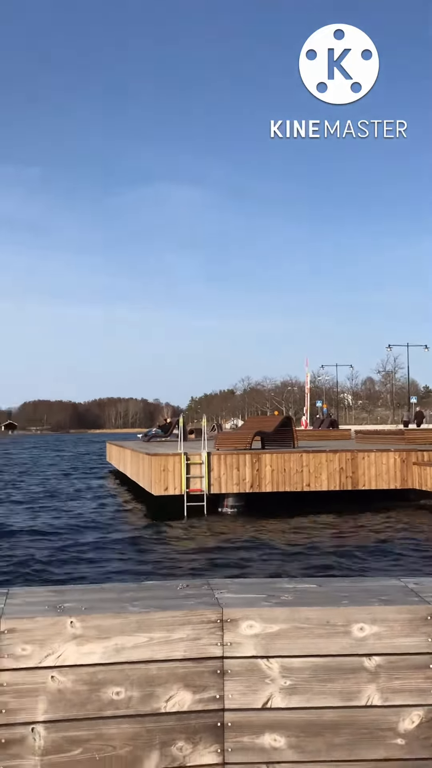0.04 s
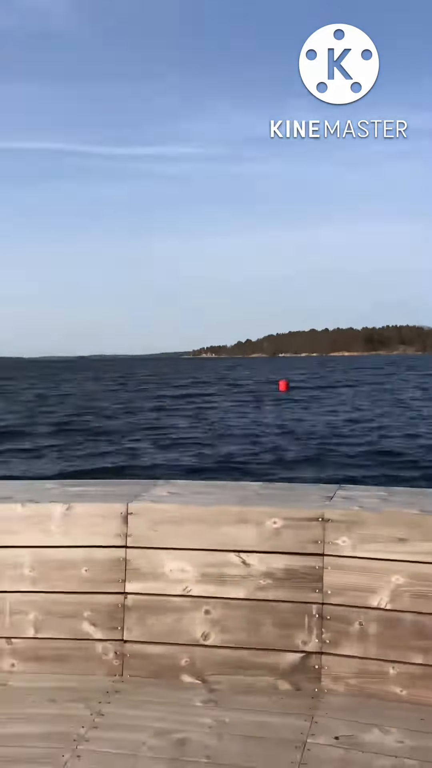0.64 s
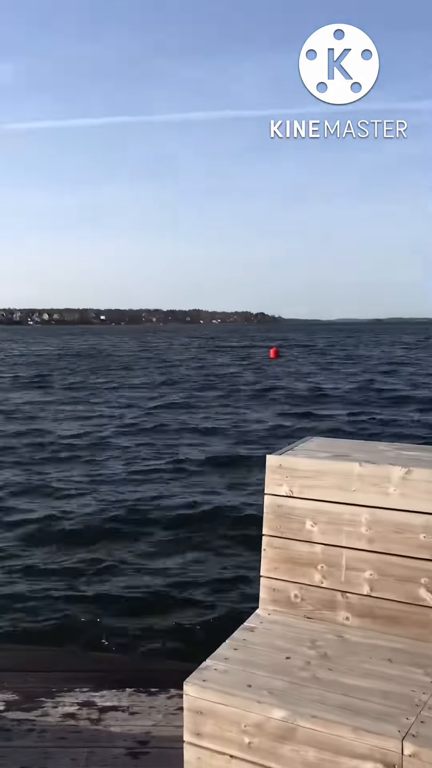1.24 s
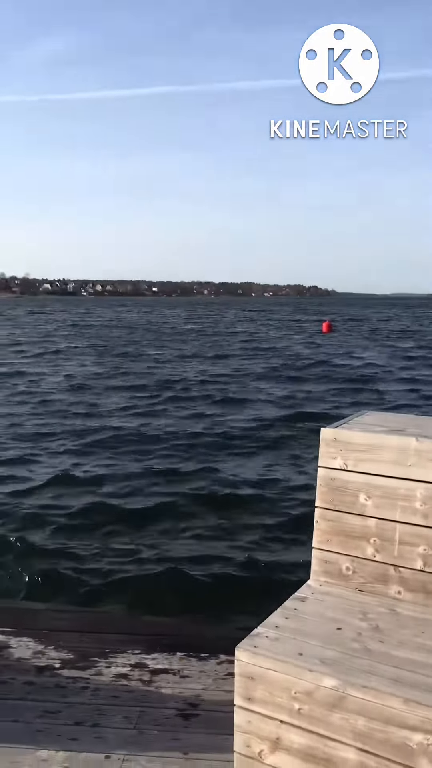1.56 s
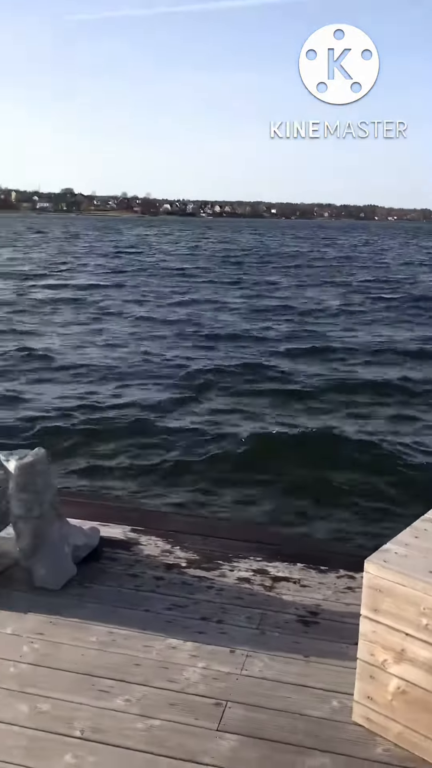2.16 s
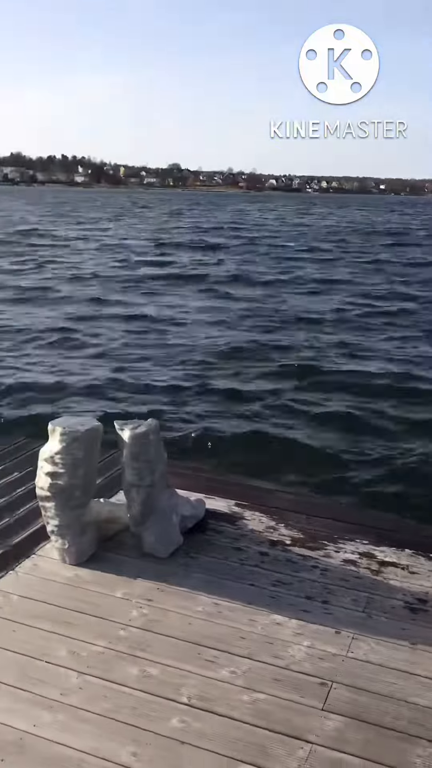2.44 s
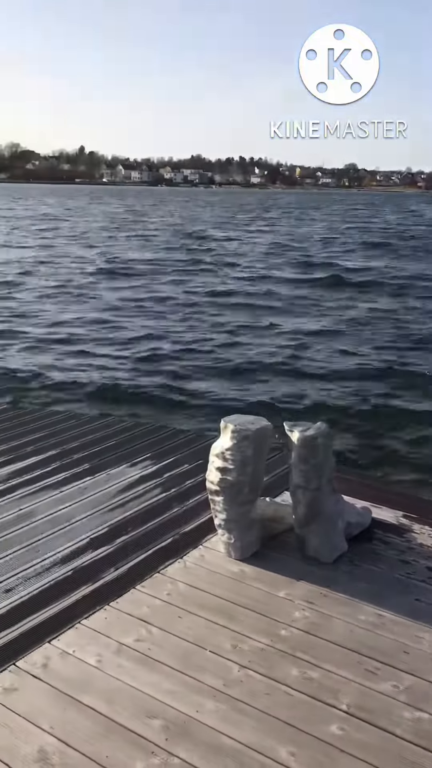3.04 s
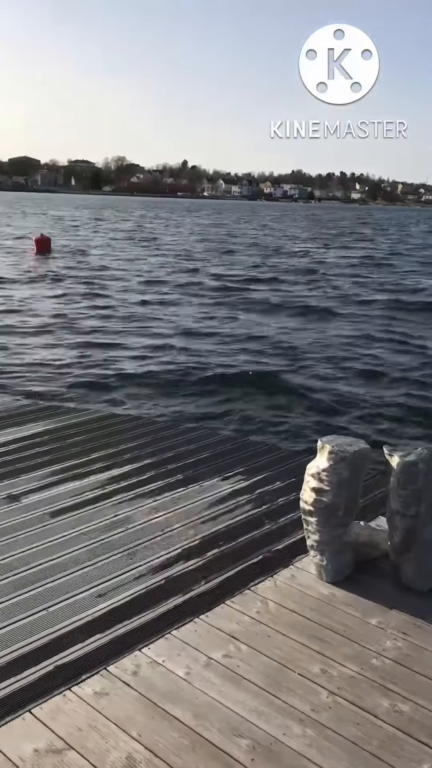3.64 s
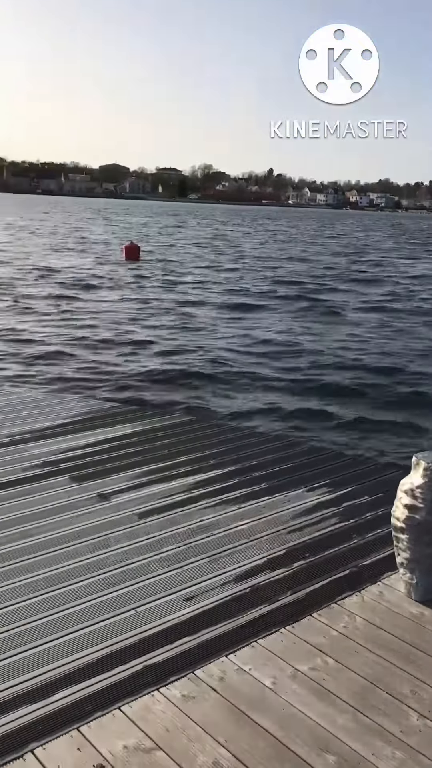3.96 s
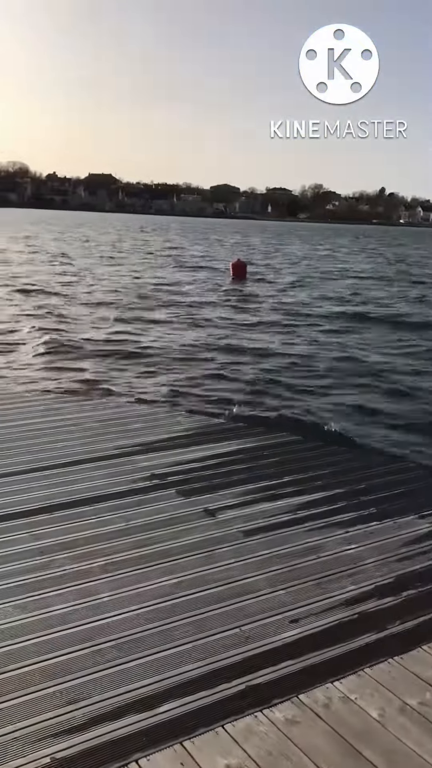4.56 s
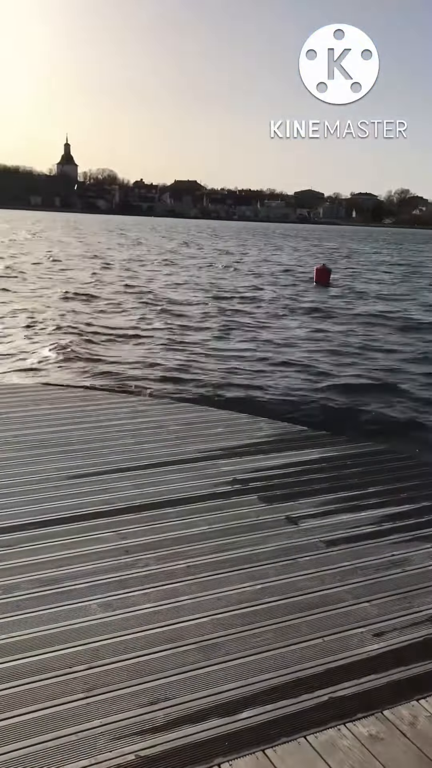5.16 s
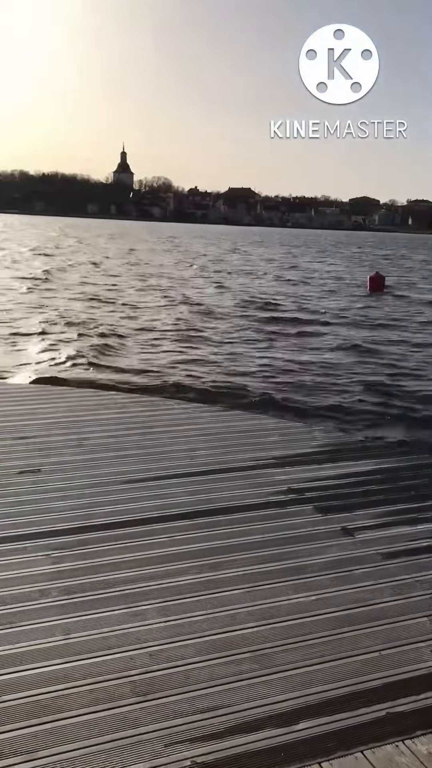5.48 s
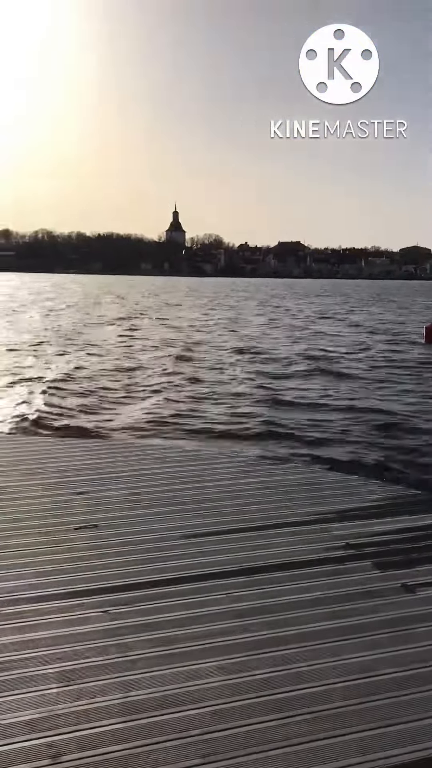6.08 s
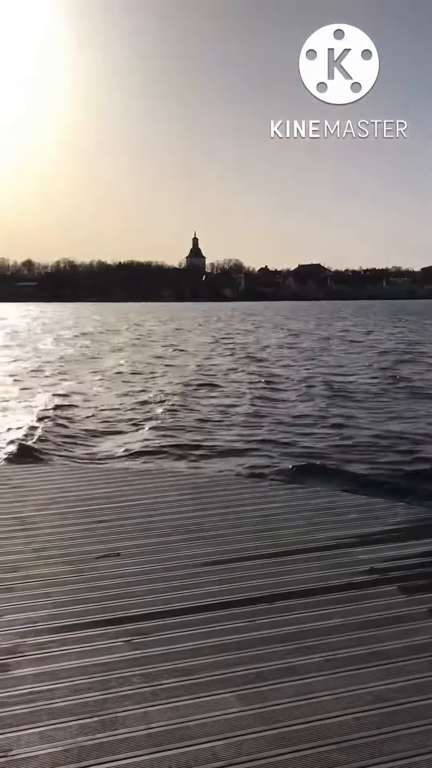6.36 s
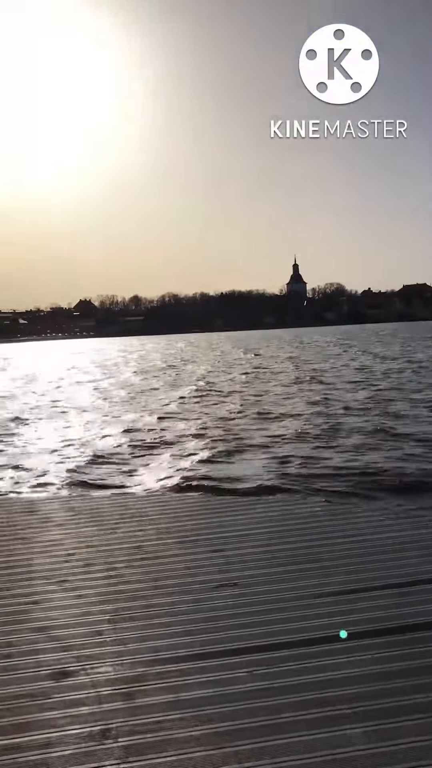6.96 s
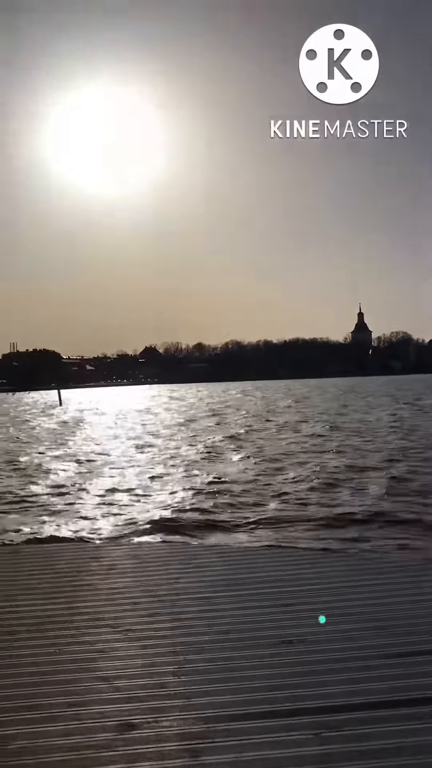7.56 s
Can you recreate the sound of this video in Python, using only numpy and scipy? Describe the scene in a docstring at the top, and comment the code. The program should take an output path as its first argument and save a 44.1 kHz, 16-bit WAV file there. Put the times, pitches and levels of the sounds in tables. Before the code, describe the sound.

Gusts of wind thump and rumble right on the microphone at the water's edge. When they drop, choppy water is heard sloshing and gurgling against wooden deck boards just in front, with small splashes, drips and hissing foam. Then a second, longer run of gusts batters the microphone, fluttering and briefly hooting, while the waves keep lapping more softly underneath.

```python
"""Choppy water at a windy deck

Small waves slop against a low wooden deck just in front of one microphone; each swells the wash
and throws fizzing spray, while drops land close by and trapped air glugs at the boards.
Wind rumbles right on the microphone throughout and buffets it in two long runs of gusts;
mostly in the second, the air sheds vortices at the microphone's edge and hoots unsteadily."""
import sys
import numpy as np
from scipy import signal
from scipy.fft import rfft, irfft, next_fast_len
from scipy.io import wavfile
from scipy.ndimage import uniform_filter1d, map_coordinates

SR = 44100
rng = np.random.default_rng(int(sys.argv[2]) if len(sys.argv) > 2 else 0)


def put_to_file(sound):
    """Save the sound as 16-bit audio at rate SR, in the file named by the first command-line argument."""
    columns = np.atleast_2d(sound).T  # one column per channel
    safe = np.clip(columns, -1, 1)
    whole_steps = np.round(safe * 32767)
    wavfile.write(sys.argv[1], SR, whole_steps.astype(np.int16))


N = 344862
TIME = np.arange(N) / SR

# air speed, as the rate at which small eddies pass the microphone: time_s, rate_hz
EDDY_RATE = [(0, 220.2), (.48, 680.5), (.56, 523.8), (.76, 518.8), (.88, 340.1), (1.1, 400.1),
             (1.35, 309.1), (1.65, 280.8), (2.1, 170.4), (4.8, 169.8), (5.0, 350.4), (5.7, 369.5),
             (6.85, 270), (7.1, 364.2), (7.33, 371.7), (7.43, 501.5), (7.8, 467.1)]
# vortex hoots at the microphone's edge: start_s, length_s, pitch_hz, share_of_gust_power
VORTEX_HOOTS = [(0.957, 0.54, 222, 0.22), (4.978, 0.071, 335, 0.69), (5.105, 0.049, 355, 0.77),
                (5.218, 0.065, 332, 0.45), (5.312, 0.032, 280, 0.49), (5.441, 0.051, 285, 0.77),
                (5.57, 0.087, 368, 0.5), (5.679, 0.18, 310, 0.33), (5.908, 0.06, 248, .4),
                (6.019, 0.22, 288, 0.48), (6.295, 0.1204, 280, 0.65), (6.453, 0.12, 326, 0.45),
                (6.555, 0.083, 230, 0.58), (6.665, 0.043, 295, .45), (6.77, 0.15, 222, 0.62)]


def surge_db():
    """Level of the water breaking at the deck: each wave builds to its crest and dies into the foam."""
    # foam lingering along the deck: time_s, level_db
    foam = [(0, -54), (1.3, -57), (2.1, -57.5), (3.2, -60), (3.8, -56.5), (4.85, -59), (5.2, -62),
            (6.1, -62), (6.95, -63), (7.82, -60.5)]
    # waves breaking on the edge: crest_s, level_db, build_s, decay_s
    waves = [(.08, -54.5, 0.083, .2), (.41, -52, 0.15, 0.23), (.93, -55.5, .1, 0.058),
             (1.55, -49.5, 0.089, .05), (1.87, -49.5, 0.094, 0.14), (2.11, -47, 0.02, .1),
             (2.45, -55, 0.1, 0.12), (2.97, -53.5, 0.14, 0.17), (3.39, -49, 0.06, 0.3),
             (4.35, -52.5, .05, 0.017), (4.54, -54, 0.099, 0.27), (5.48, -56, 0.061, 0.1),
             (5.8, -54, .04, 0.053), (6.02, -57.5, 0.087, 0.26), (6.73, -58.5, 0.018, 0.035),
             (7.15, -56, .02, 0.052), (7.62, -59.5, .14, 0.036)]
    power = amp(follow(foam)) ** 2
    for crest, db, build, decay in waves:
        t = TIME - crest
        fall = np.minimum(np.maximum(-t / build, t / decay), 20)
        power += (amp(db) * np.exp(-fall)) ** 2
    return 10 * np.log10(power)


def wash(base_db=-55, swell_db_per_db=0.47):
    """Near water bubbles and gurgles over the blur of farther wavelets, swelling with each wave."""
    # spectrum of sloshing water: frequency_hz, gain_db
    spectrum = [(120, -12), (250, 1.5), (450, 0), (700, 2), (980, 2.5), (1400, -1.5), (2000, -9),
                (3000, -23.5), (5000, -30), (15000, -45)]
    near = bubbles(low_hz=235.6, high_hz=4030, per_s=1600, cycles=19, spread_db=3, rise=0.095)
    near = steady(colour(near, spectrum), seconds=0.23)
    far = colour(rng.standard_normal(N), spectrum)
    gurgle = bubbles(low_hz=229.6, high_hz=714, per_s=56, cycles=100, spread_db=3, rise=0.062, count=18)
    level_db = surge_db()
    swell = amp(base_db + swell_db_per_db * (level_db - level_db.mean()))
    return swell * (amp(5.5) * near + amp(5) * far + amp(1) * gurgle)


def spray(sparkle_hz=6000):
    """Tiny bubbles and droplets crackle over hissing foam, loudest and brightest as a crest breaks."""
    # spectrum of spray and foam: frequency_hz, gain_db
    spectrum = [(600, -2.5), (1500, 3.5), (2800, 3.5), (4000, 0), (6000, -3.5), (8500, -8), (12000, -13.5),
                (15500, -17)]
    level_db = surge_db()
    excess_db = level_db - level_db.mean()
    fizz = bubbles(low_hz=1528, high_hz=14170, per_s=1900, cycles=49, spread_db=4, rise=0.045)
    fizz = steady(colour(fizz, spectrum), seconds=0.067) * amp(0.058 * excess_db)
    hiss = colour(rng.standard_normal(N), spectrum) * amp(2 + 1.8 * wander(rate_hz=26))
    fine = signal.filtfilt(*signal.butter(2, sparkle_hz, "high", fs=SR), fizz + hiss)
    sparkle = (amp(0.25 * excess_db) - 1) * fine  # a strong wave throws extra fine spray
    return amp(level_db) * (fizz + hiss + sparkle)


def glugs(churn=0.72):
    """Water slaps the boards, and the trapped air rings unevenly as it churns."""
    # waves slapping the deck: start_s, level_db, pitch_hz, t60_s, splatter_share
    slaps = [(1.845, -32, 840, 0.092, 0.5), (1.869, -21, 600, 0.13, 0.78), (1.968, -30.5, 1670, 0.11, 0.77),
             (2.47, -38, 810, 0.11, 0.5), (2.975, -33, 943, 0.083, 0.2), (3.28, -28, 431, 0.15, 0.47),
             (3.38, -28, 960, 0.091, 0.24), (3.595, -31, 315, 0.097, 0.34), (3.695, -30, 259, 0.13, 0),
             (4.257, -27.5, 267, 0.11, 0.44), (4.335, -36, 600, 0.17, 0.57), (4.51, -26.5, 940, 0.14, 0.9),
             (4.885, -32, 753, 0.11, 0.5)]
    out = np.zeros(N)
    for start, db, hz, t60, splatter in slaps:
        noise = rng.standard_normal(SR)
        add(out, start, amp(db + 0.5) * splash(noise, hz, t60, ring=1 - splatter, splat=0.3 * splatter))
    return out * (1 + churn * wander(rate_hz=240))


def drops():
    """Each drop lands with a splat and a short ring."""
    # drops landing close to the microphone: start_s, level_db, pitch_hz
    landings = [(.524, -34, 7300), (1.202, -30, 6450), (1.425, -29.5, 12000), (1.571, -26, 6600),
                (2.392, -26.5, 5850), (2.468, -29, 7040), (2.615, -37, 7000), (2.91, -27.5, 6700),
                (2.981, -28.5, 5000), (3.392, -26, 6400), (4.14, -31, 7500), (4.228, -26.5, 8800),
                (4.948, -32.5, 4194), (5.8, -37, 13870), (6.313, -34.5, 3300), (6.537, -38, 5810),
                (6.575, -38, 7800), (6.882, -38.5, 4000), (7.146, -41, 7000)]
    out = np.zeros(N)
    for start, db, hz in landings:
        noise = rng.standard_normal(SR // 2)
        add(out, start, amp(db) * splash(noise, hz, t60=0.022, ring=0.11, splat=0.26))
    return out


def splash(noise, hz, t60, ring, splat):
    """A short burst of splatter around the pitch of the bubble that it leaves ringing."""
    tone = bubble(hz, t60, rise=0.12)
    band = signal.butter(2, [hz * 0.55, min(hz * 1.7, SR * 0.45)], "band", fs=SR)
    burst = unit(signal.lfilter(*band, noise))[:len(tone)] * np.geomspace(1, 1e-3, len(tone))
    return ring * tone + splat * burst


def bubbles(low_hz, high_hz, per_s, cycles, spread_db, rise, count=36):
    """A cloud of bubbles of many sizes: most are faint, a few loud."""
    out = np.zeros(N)
    for hz in np.geomspace(low_hz, high_hz, count):
        when, chance = rng.random((4000, 2))[:int(per_s * N / SR / count)].T
        strength = amp(spread_db * np.minimum(-np.log(1 - chance), 4))
        births = np.bincount((when * N).astype(int), strength, N)
        out += signal.oaconvolve(births, bubble(hz, cycles / hz, rise))[:N] * hz
    return unit(out)


def bubble(hz, t60, rise):
    """A dying ring whose pitch climbs as the bubble nears the surface."""
    t = np.arange(int(t60 * SR) + 2) / SR
    phase = 2 * np.pi * hz * t * (1 + rise * t / t60 / 2)
    onset = 1 - np.exp(-2 * t * hz)
    return np.sin(phase) * onset * amp(-60 * t / t60)


def gust_strength(breeze_db=-48.5, punch_s=0.13):
    """Most gusts hit with a punch, settle and sag toward their end; a light breeze fills the lulls."""
    # gusts striking the microphone: start_s, length_s, level_db, punch_db, sag_db
    gusts = [(0.224, 0.13, -33, 2, 3), (0.409, 0.416, -17.5, 7.5, 0), (0.886, 0.66, -17.5, -1, 11.5),
             (1.585, 0.092, -27, -2, -3), (1.766, 0.16, -34, -15, -10), (2.043, 0.12, -34, 2, 2),
             (3.037, .035, -33, 2, -3), (3.786, 0.054, -30, -2, 0), (4.493, 0.2, -32.5, 3, 4),
             (4.981, 0.078, -19.5, 5.5, 4), (5.096, 0.12, -25, 3, 7.5), (5.218, 0.12, -23.5, 2.5, 2.5),
             (5.32, .035, -16.5, 3, 1), (5.37, .04, -20, 0.5, -1), (5.443, 0.024, -21, 2.5, -3),
             (5.549, 0.64, -20, 3.5, 1.5), (6.295, 0.66, -19, -2.5, 3), (6.974, 0.288, -24.5, 3.5, 0.5),
             (7.276, 0.11, -27, 3, -6.5), (7.377, 0.17, -19.5, 8, 1), (7.551, 0.13, -20, 3.5, 5),
             (7.696, 0.21, -22, 1.5, -5.5)]
    power = amp(breeze_db) ** 2
    for start, length, db, punch_db, sag_db in gusts:
        age = np.clip(TIME - start, 0, length)
        level_db = db + punch_db * np.exp(-age / punch_s) - sag_db * (age / length) ** 2
        power += (rush(start, length) * amp(level_db)) ** 2
    return np.sqrt(power)


def rush(start, length, attack_s=0.022, release_s=0.013):
    """Attack, hold and release of a rush of air, 0-1."""
    t = TIME - start
    return np.clip(t / attack_s, 0, 1) * np.exp(-np.clip((t - length) / release_s, 0, 20))


def buffeting(flutter_db=4):
    """Small eddies flutter past, louder and brighter in faster air; at times part of the gust hoots."""
    # spectrum of the small eddies: multiple_of_eddy_rate, gain_db
    spectrum = [(.05, -44), (.15, -11.5), (.33, 0.5), (.7, 2), (1.1, -5), (1.5, -10.5), (2.2, -21.5),
                (3.2, -36.5), (5, -53), (10, -85)]
    flutter = 2 * np.tanh(wander(rate_hz=91.3) / 2)
    rate = follow(EDDY_RATE) * np.exp(0.1419 * flutter)
    pattern = colour(rng.standard_normal(N), spectrum, scale_hz=rate.mean())
    eddies = steady(carried(pattern, rate / rate.mean()) * amp(flutter_db * flutter), seconds=0.031)
    share = np.clip(sum(part * rush(start, length) for start, length, _, part in VORTEX_HOOTS), 0, 1)
    strength = gust_strength() * amp(-0.33 + 0.03 * wander(rate_hz=23))
    return strength * (np.sqrt(1 - share) * eddies + np.sqrt(share) * hoot(share))


def hoot(share, waver=0.139, octave_db=-17):
    """Vortices leave the edge almost regularly; the weaker the hoot, the more its pitch trembles."""
    notes = [(s, hz) for start, length, hz, _ in VORTEX_HOOTS for s in (start, start + length)]
    pitch = follow(notes) * (1 + waver * (1 - share) * wander(rate_hz=65.8))
    phase = 2 * np.pi * np.cumsum(pitch) / SR
    tone = np.sin(phase) + amp(octave_db) * np.sin(2 * phase)
    return steady(tone * amp(4.9 * wander(rate_hz=40)), seconds=0.039)


def thumps():
    """The strongest single eddies: large ones thud, small ones snap."""
    # eddies hitting the microphone: peak_s, peak_db, centre_hz
    hits = [(0.173, -20.5, 372), (0.181, -5, 54.6), (.269, -10, 775), (0.273, -2.5, 510),
            (0.34, -15.5, 515), (.435, -7, 500), (.472, -13, 1700), (0.49, -6.5, 1300), (.503, -14, 1100),
            (.61, -10, 520), (0.769, -12, 606), (1.031, -11.5, 450), (1.064, -7, 400), (1.165, -11, 443),
            (1.469, -12, 363), (3.064, -10.5, 76), (5.338, -9.5, 332.5), (7.065, -6, 318), (7.23, -11, 400),
            (7.407, -5.5, 400), (7.42, -9.5, 950), (7.465, -3, 436), (7.477, -19.5, 1400),
            (7.528, -10, 556), (7.628, -7.5, 716), (7.727, -12.5, 750), (7.799, -11.5, 550)]
    out = np.zeros(N)
    for peak, db, hz in hits:
        pulse = eddy(hz)
        add(out, peak - len(pulse) / SR / 2, amp(db) * pulse)
    return out


def crackle(per_s=70, spread_db=8.5, count=5):
    """The fastest air tears off tight little eddies that crack against the microphone's port."""
    out = np.zeros(N)
    for hz in np.geomspace(450, 1000, count):
        when, chance, side = rng.random((2000, 3))[:int(per_s * N / SR / count)].T
        strength = np.sign(side - 0.5) * amp(spread_db * np.minimum(-np.log(1 - chance), 3))
        hits = np.bincount((when * N).astype(int), strength, N)
        out += signal.oaconvolve(hits, eddy(hz), "same")
    rate = follow(EDDY_RATE)
    return gust_strength() * amp(-11) * (rate / rate.max()) ** 4.16 * unit(out)


def eddy(hz, roundness=12.3):
    """A lone eddy gives one pressure peak between two troughs."""
    t = np.arange(-2000, 2001) / SR
    offset_sq = (np.pi * hz * t) ** 2 / roundness
    return (1 - (2 * roundness + 1) * offset_sq) / (1 + offset_sq) ** (roundness + 2)


def rumble(gust_push_db=-11.5, lumpy_db=2):
    """Large slow eddies press on the microphone, harder in a gust and a little higher in faster air."""
    # spectrum of the large eddies: frequency_hz, gain_db
    spectrum = [(20, -35), (31, -14.5), (42, -3.5), (60, 2.5), (82, -1), (115, -6.5), (170, -14),
                (290, -23), (500, -55), (1000, -78.5)]
    # slow wind pressure on the microphone: time_s, level_db
    wind_level = [(0.0, -31.5), (0.48, -16.5), (0.74, -21.5), (2.7, -37), (4.46, -30.5), (4.75, -38),
                  (5.86, -26), (6.21, -36.5), (7.82, -22)]
    # large eddies rolling over the microphone: peak_s, level_db, half_length_s
    rolls = [(0.161, -19, 0.022), (0.466, -12.5, 0.13), (1.01, -27, 0.12), (1.496, -21.5, 0.08),
             (1.878, -27, 0.063), (2.458, -25.5, 0.019), (2.675, -27, 0.051), (3.047, -20, 0.028),
             (3.203, -28, 0.093), (3.386, -29.5, .06), (3.775, -24.5, 0.029), (4.065, -27, 0.055),
             (4.258, -26, 0.031), (4.565, -28, 0.14), (4.942, -20.5, 0.044), (7.444, -13, 0.022),
             (7.76, -21.5, 0.23)]
    pace = follow(EDDY_RATE) ** 0.25
    pressure = carried(colour(rng.standard_normal(N), spectrum), pace / pace.mean())
    power = amp(follow(wind_level) - 0.5 + lumpy_db * wander(rate_hz=6.3)) ** 2
    power += (amp(gust_push_db) * gust_strength()) ** 2
    for peak, db, half in rolls:
        power += amp(db) ** 2 * np.exp(-np.minimum(((TIME - peak) / half) ** 2, 20))
    return np.sqrt(power) * steady(pressure, seconds=0.059)


def carried(pattern, pace):
    """A frozen pattern of eddies drifts past: a quicker pace raises all its frequencies."""
    return map_coordinates(pattern, [np.cumsum(pace)], order=3, mode="mirror")


def amp(db):
    """Decibels to gain."""
    return 10 ** (np.asarray(db) / 20)


def unit(x):
    """Scales to rms 1."""
    return x / np.sqrt(np.mean(x ** 2) + 1e-20)


def follow(curve):
    """A curve of (time, value) points at every sample."""
    return np.interp(TIME, *np.transpose(curve))


def colour(x, spectrum, scale_hz=1):
    """Filters by a spectrum drawn on a log-frequency axis, then scales to rms 1."""
    knots, db = np.transpose(spectrum)
    size = next_fast_len(N)
    hz = np.maximum(np.fft.rfftfreq(size, 1 / SR), 1)
    gain = amp(np.interp(np.log(hz), np.log(knots * scale_hz), db))
    return unit(irfft(rfft(x, size) * gain, size)[:N])


def wander(rate_hz):
    """Smooth random drift of rms 1 that changes up to about the given rate."""
    size = next_fast_len(N)
    hz = np.fft.rfftfreq(size, 1 / SR)
    return unit(irfft(rfft(rng.standard_normal(size)) / (1 + (hz / rate_hz) ** 4), size)[:N])


def steady(x, seconds):
    """Takes out swells slower than the given time and keeps the fine grain."""
    size = int(seconds * SR)
    power = uniform_filter1d(uniform_filter1d(x ** 2, size), size)
    return x / np.sqrt(abs(power) + 1e-9)


def add(mix, start_s, sound):
    """Mixes a sound in at a time."""
    part = mix[max(round(start_s * SR), 0):][:len(sound)]
    part += sound[:len(part)]


def scene():
    """Water in front of the deck, wind right at the microphone, in mono."""
    water = wash() + spray() + drops() + glugs()
    wind = rumble() + buffeting() + crackle() + thumps()
    return (water + wind)[None]


def record(dry, band_limit_hz=15750):
    """The microphone overloads softly at full scale; its port and band limit then shape the treble."""
    # notches cut by the narrow sound port: centre_hz, width_hz, gain_db
    notches = [(4920, 230, -3.5), (7700, 690, -2.5), (10450, 470, -4.5)]
    hz = np.linspace(0, SR / 2, 1025)
    port_db = sum(db * np.exp(-((hz - centre) / width) ** 2) for centre, width, db in notches)
    port = signal.firwin2(511, hz, amp(port_db), fs=SR)
    lowpass = signal.firwin(511, band_limit_hz, window=("kaiser", 9), fs=SR)
    overloaded = dry / (1 + dry ** 6) ** (1 / 6)
    faded = overloaded * signal.windows.tukey(N, 0.0015)
    return signal.oaconvolve(faded, np.convolve(port, lowpass)[None], "same")


dry = scene()
out = record(dry)
put_to_file(out)
```